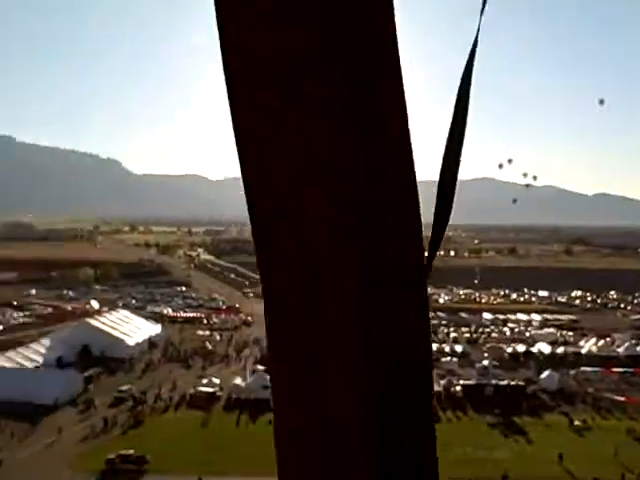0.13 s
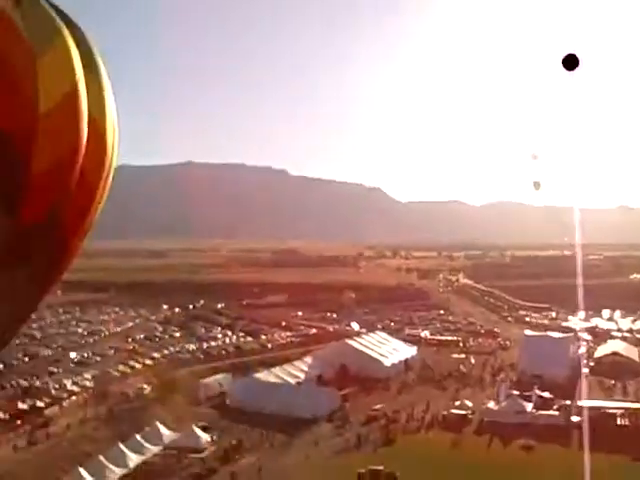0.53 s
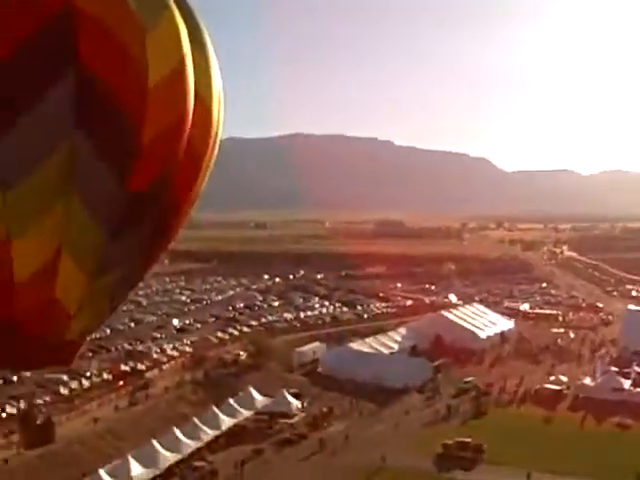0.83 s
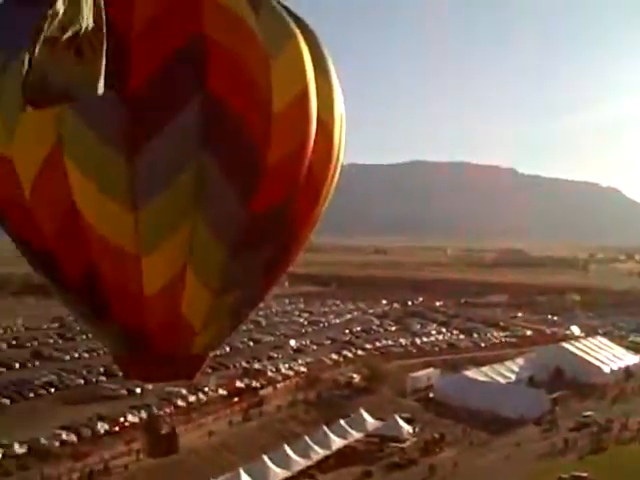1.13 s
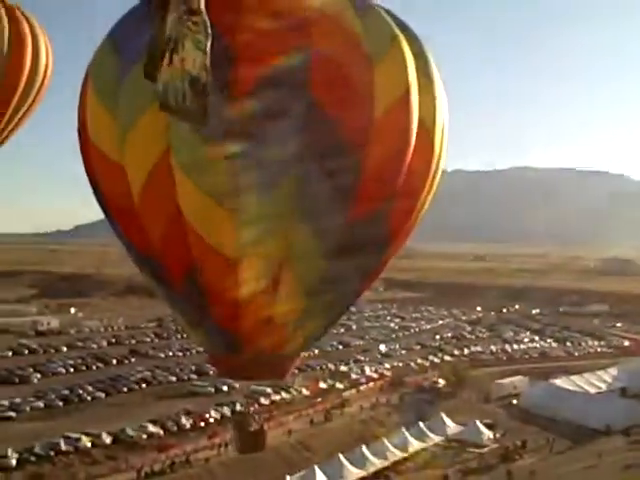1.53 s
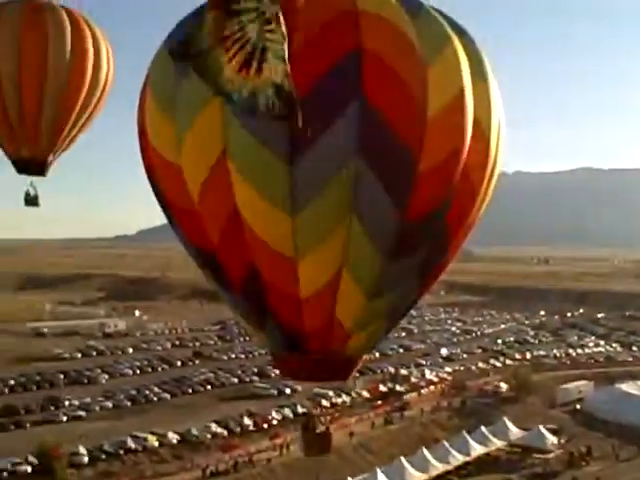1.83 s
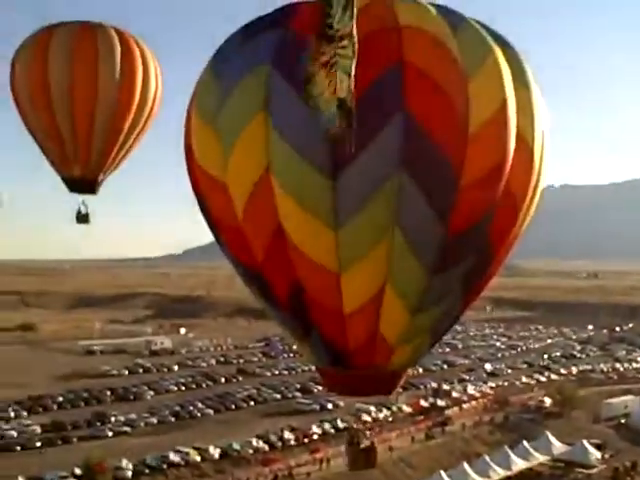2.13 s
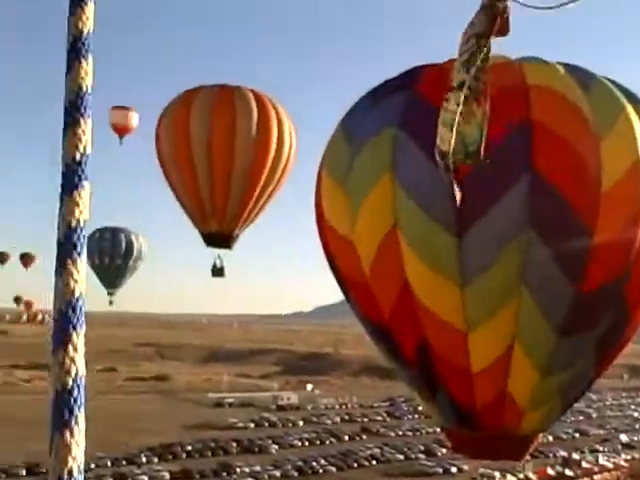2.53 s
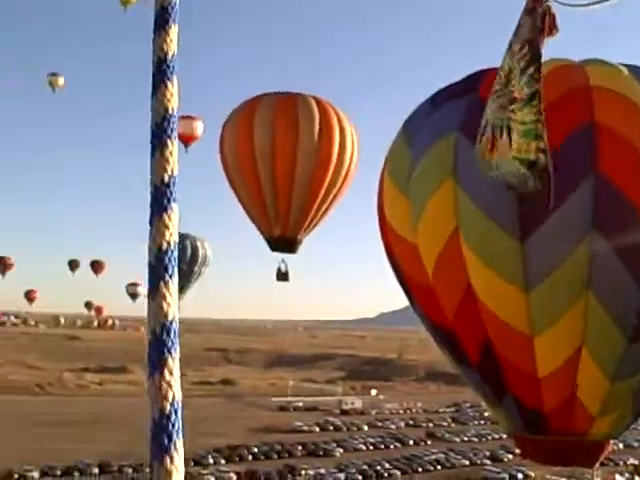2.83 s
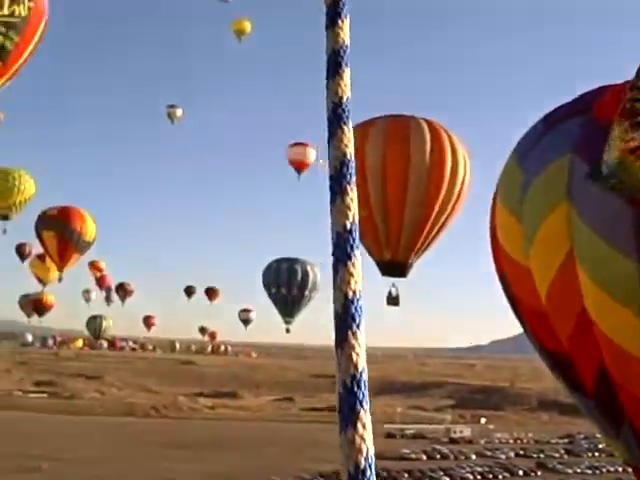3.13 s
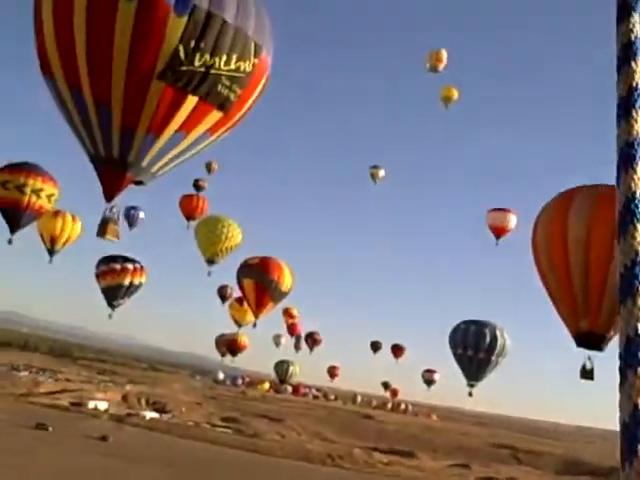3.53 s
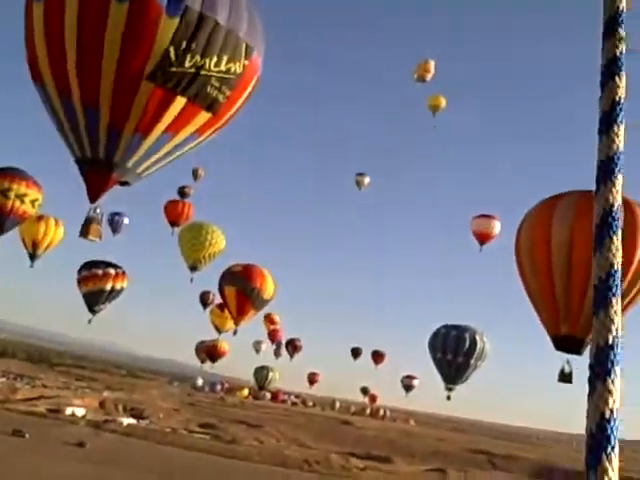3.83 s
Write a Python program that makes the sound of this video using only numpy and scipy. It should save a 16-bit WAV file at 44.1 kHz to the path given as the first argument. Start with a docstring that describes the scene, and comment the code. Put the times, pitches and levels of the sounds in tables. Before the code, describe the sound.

A hot-air balloon gas burner lights with a thump and roars close above the basket, slightly overloading the microphone. Before that, a neighbouring burner hisses, swells and shuts off over a faint low rumble.

```python
"""In the basket of a hot-air balloon, far burners rumble. A neighbouring burner hisses, swells and
shuts off. Then the burner overhead lights with a thump and roars: a jet of gas makes the hiss,
and its swirling flame makes the roar. The camera's microphone dulls the highest sounds,
and the roar overloads its input."""
import sys
import numpy as np
from scipy.fft import rfft, irfft, next_fast_len
from scipy.io import wavfile
from scipy.ndimage import map_coordinates

SR = 44100
rng = np.random.default_rng(int(sys.argv[2]) if len(sys.argv) > 2 else 0)


def materialize(psi):
    """Save the field psi as 16-bit PCM at rate SR to the path in sys.argv[1].

    A 1-D psi becomes a single channel; in a 2-D psi each row is a channel.
    """
    bounded = np.clip(np.atleast_2d(psi).T, -1, 1)
    quanta = np.round(bounded * 32767).astype(np.int16)
    wavfile.write(sys.argv[1], SR, quanta)


N = 176400
LIGHT_S = 2.711  # when the burner overhead lights


def amp(db):
    """Turn decibels into a number to multiply a sound by."""
    return 10 ** (np.asarray(db) / 20)


def unit(x):
    """Scale a sound so that its average strength (rms) is 1."""
    return x / np.sqrt(np.mean(x ** 2) + 1e-20)


def clock():
    """The time of each sample, in seconds."""
    return np.arange(N) / SR


def curves(rows):
    """Join a table's rows with straight lines: one curve for each column after the time."""
    times, *columns = np.transpose(rows)
    return [np.interp(clock(), times, column) for column in columns]


def wobble(rate):
    """A smooth curve through `rate` random values a second."""
    return map_coordinates(rng.standard_normal(int(N * rate / SR) + 4), [clock() * rate])


def filtered(x, response):
    """Multiply each frequency in a sound by response(frequency)."""
    size = next_fast_len(N + SR // 2)
    hz = np.fft.rfftfreq(size, 1 / SR)
    return irfft(rfft(x, size) * response(hz), size)[..., :N]


def coloured(x, points):
    """Shape a sound's tone with a table of (frequency [Hz], level [dB])."""
    freqs, db = np.transpose(points)
    return filtered(x, lambda hz: amp(np.interp(np.log(hz + 1), np.log(freqs + 1), db)))


def turbulence(spectrum, flutter_db, rate):
    """Swirling gas: shaped noise of strength 1 whose level flutters with the swirls."""
    noise = coloured(rng.standard_normal(N), spectrum)
    return unit(noise * amp(flutter_db * wobble(rate)))


def far_rumble():
    """Far burners and moving air make a steady low rumble."""
    # tone of the rumble (frequency [Hz], level [dB])
    rumble_tone = [(15, -16.5), (30, -4), (55, 0), (115, -4.5), (160, -5), (220, -8.5), (320, -12),
                   (420, -18.5), (620, -19.5), (820, -23), (1200, -28.5), (3000, -32.5), (6200, -31),
                   (7500, -41.5), (8200, -46)]
    return amp(-30.5) * turbulence(rumble_tone, flutter_db=-1, rate=13.03)


def basket_echoes(hiss):
    """Hiss bounces off the basket by paths that grow as the camera turns: a shifting, hollow sound."""
    # one row per echo (delay [ms], delay growth [ms/s], level [dB], fade [dB/s])
    paths = [(.43, 0.22, -23, 7), (1.06, .27, -14.5, 10.5)]
    t = clock()
    echoes = np.zeros(N)
    for delay_ms, growth, db, fade in paths:
        delay_s = (delay_ms + growth * t) / 1000
        echoes += amp(db - fade * t) * map_coordinates(hiss, [(t - delay_s) * SR])
    return echoes


def neighbour_burner():
    """A burner some way off hisses and swells; when its valve shuts, the roar outlasts the hiss."""
    # how the burner swells (time [s], jet level [dB], flame level [dB])
    levels = [(0, -29, -38.5), (.25, -27, -44), (.5, -27, -47.5), (1.07, -27, -46), (1.35, -23, -35),
              (1.6, -21.5, -30.5), (1.8, -22.5, -26.5), (1.95, -28, -30.5)]
    # tone of its gas jet (frequency [Hz], level [dB])
    hiss_tone = [(300, -35), (1000, -15.5), (2500, -11.5), (3600, -9), (4600, -6), (5050, -7), (5600, -1),
                 (6200, 3), (6900, -3), (7600, -5.5), (8500, -9.5)]
    # tone of its flame (frequency [Hz], level [dB])
    roar_tone = [(25, -15), (70, -5), (165, 0.5), (240, -4), (310, -2.5), (420, -5.5), (550, -11),
                 (700, -12.5), (830, -10.5), (1020, -21.5), (3000, -34)]
    shut_s, jet_fall_db_per_s = 1.997, 166
    flame_fall_db_per_s, linger_db, linger_fall_db_per_s = 51, -5, 3
    jet_db, flame_db = curves(levels)
    since_shut = np.maximum(clock() - shut_s, 0)
    hiss = turbulence(hiss_tone, flutter_db=0.5, rate=32)
    jet = amp(jet_db - jet_fall_db_per_s * since_shut) * (hiss + basket_echoes(hiss))
    # the roar drops quickly at first, then lingers over the field
    dying_db = np.maximum(-flame_fall_db_per_s * since_shut,
                          linger_db - linger_fall_db_per_s * since_shut)
    roar = amp(flame_db + dying_db) * turbulence(roar_tone, flutter_db=-0.5, rate=22)
    return jet + roar


def gas_jet():
    """The valve opens overhead: a little gas leaks out, then a strong, sputtering hiss that settles."""
    # tone of the rushing gas (frequency [Hz], level [dB])
    hiss_tone = [(400, -21), (1500, -11.5), (3000, -10.5), (3700, -7), (4400, -3.5), (5000, -6), (5900, 1),
                 (6800, -6.5), (7500, -3), (8500, -7.5)]
    leak_s, leak_db, rise_s = 0.014, -15.5, 0.059
    settled_db, extra_db, settle_s = -16.5, 6, 0.4
    age = np.maximum(clock() - LIGHT_S, 0)
    leak = amp(leak_db) * np.clip((clock() - LIGHT_S + leak_s) / leak_s, 0, 1) ** 2
    opening = np.maximum(leak, np.clip(age / rise_s, 0, 1))
    level_db = settled_db + extra_db / (1 + (age / settle_s) ** 2)
    return opening * amp(level_db) * turbulence(hiss_tone, flutter_db=0.65, rate=110)


def ignition():
    """The gas catches fire: a few slow swings of air pressure thump inside a dull burst of flame."""
    # tone of the burst (frequency [Hz], level [dB])
    burst_tone = [(20, -9), (60, -5), (200, 4), (400, -15.5), (800, -15), (2000, -56)]
    thump_hz, peak_s = 90.6, 0.013
    age = np.maximum(clock() - LIGHT_S, 0)
    swell = age / peak_s * np.exp(1 - age / peak_s)  # rises to 1, then dies away
    thump = amp(-3.5) * swell ** 2 * np.sin(2 * np.pi * thump_hz * age)
    burst = amp(-8.5) * swell * unit(coloured(rng.standard_normal(N), burst_tone))
    return thump + burst


def flame():
    """The flame overhead grows into a swirling, surging roar."""
    # how the flame surges and sinks (time [s], level change [dB])
    surges = [(2.76, -1), (2.85, 1), (2.95, 2.5), (3.06, 0.5), (3.22, 3.5), (3.35, 0.5), (3.48, -1),
              (3.7, 0), (3.85, -0.5), (4.0, -2)]
    # tone of the flame (frequency [Hz], level [dB])
    roar_tone = [(15, -16), (42, -3.5), (90, -3.5), (160, 1), (200, -2.5), (300, -2.5), (375, -8.5),
                 (440, -7), (495, -13), (570, -8), (740, -20.5), (1300, -24.5), (2000, -30.5), (5000, -32)]
    base_db, rise_s = -6, 0.13
    surge_db, = curves(surges)
    growth = np.sqrt(np.clip((clock() - LIGHT_S) / rise_s, 0, 1))
    return growth * amp(base_db + surge_db) * turbulence(roar_tone, flutter_db=0.6, rate=41)


def scene():
    """All the sounds as they reach the basket, in one channel."""
    return (far_rumble() + neighbour_burner() + gas_jet() + ignition() + flame())[None]


def record(dry):
    """The microphone dulls the highs; its input overloads, so big swings of the roar chop the hiss."""
    # how well the microphone hears each pitch (frequency [Hz], gain [dB])
    mic_tone = [(7400, 0.5), (7800, -6), (8400, -7.5), (8800, -14.5), (9300, -47), (10000, -94)]
    # how the camera softens the highs after the overload (frequency [Hz], gain [dB])
    output_tone = [(8000, 0), (9200, -8.5), (15000, -7.5)]
    ceiling, hardness, top_hz = 0.705, 18, 15800
    heard = coloured(dry, mic_tone)
    # flatten the peaks so that they stay under the ceiling
    clipped = heard / (6.5 + np.abs(heard / ceiling) ** hardness) ** (1 / hardness)
    return filtered(coloured(clipped, output_tone), lambda hz: hz < top_hz)


dry = scene()
out = record(dry)
materialize(out)
```